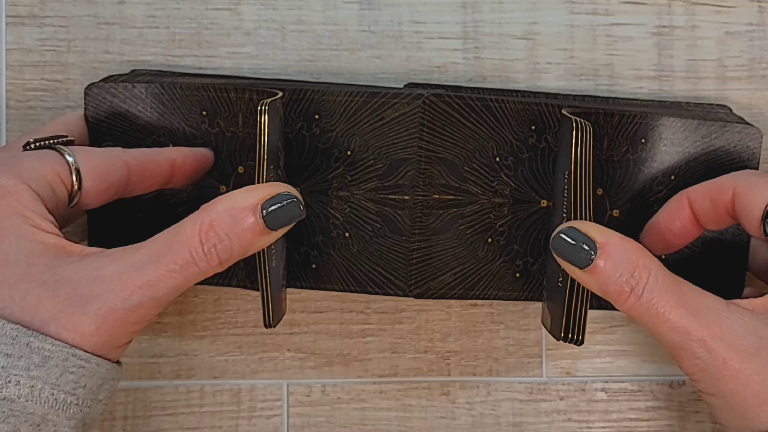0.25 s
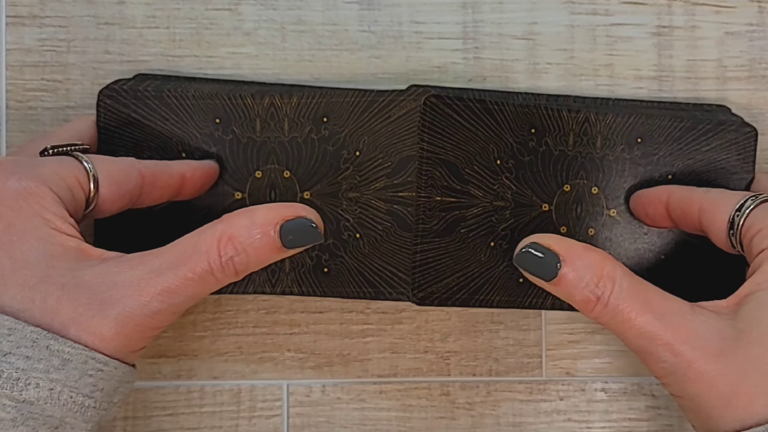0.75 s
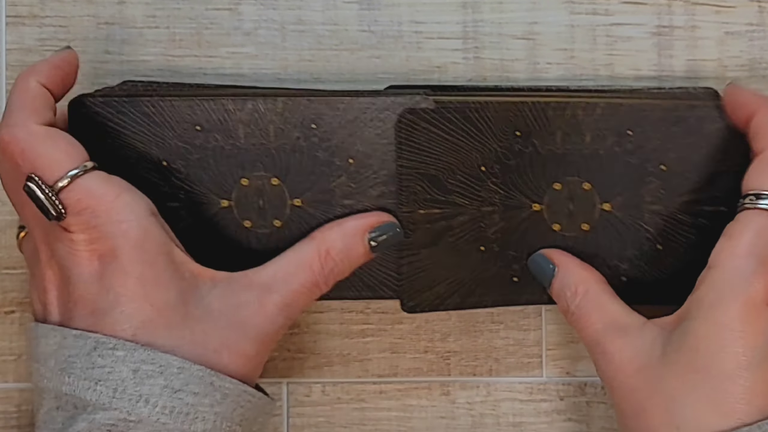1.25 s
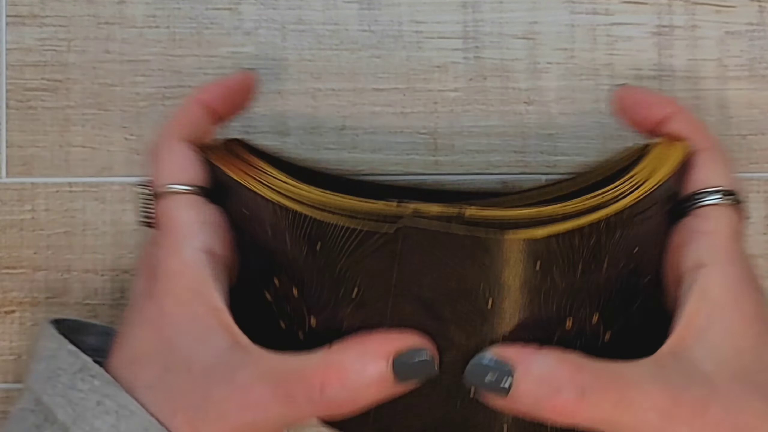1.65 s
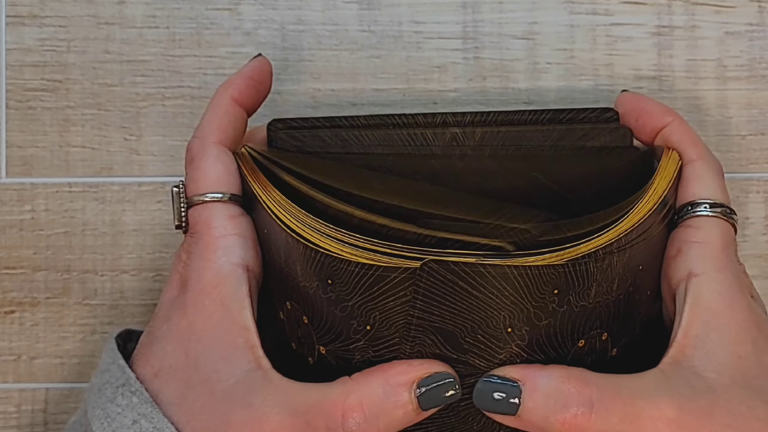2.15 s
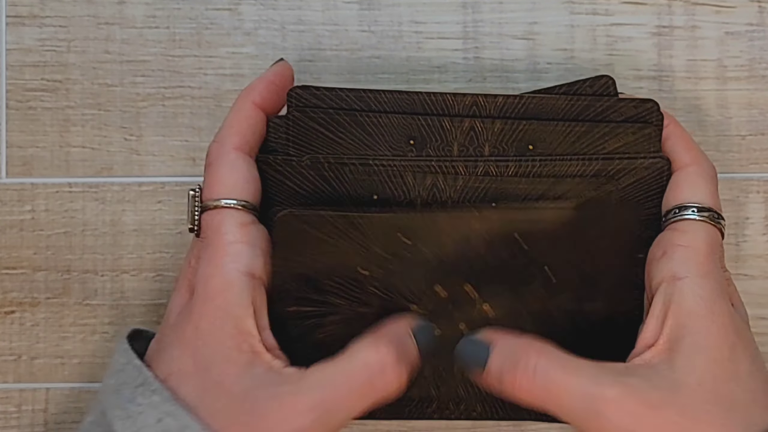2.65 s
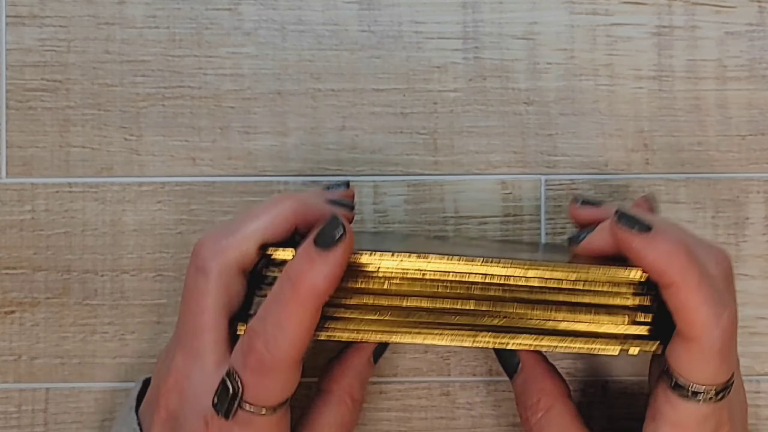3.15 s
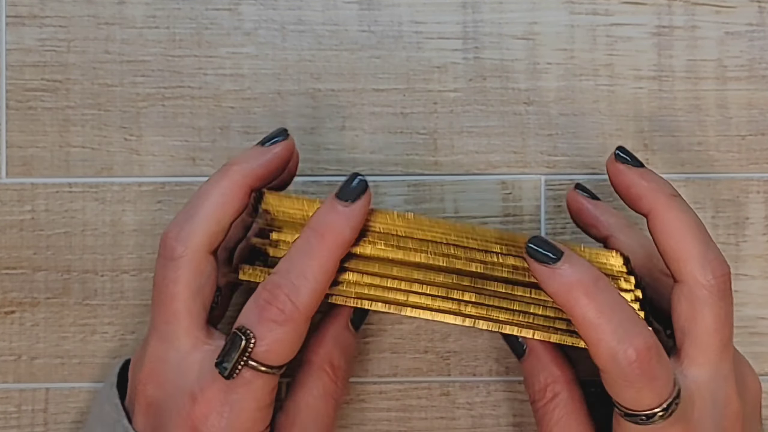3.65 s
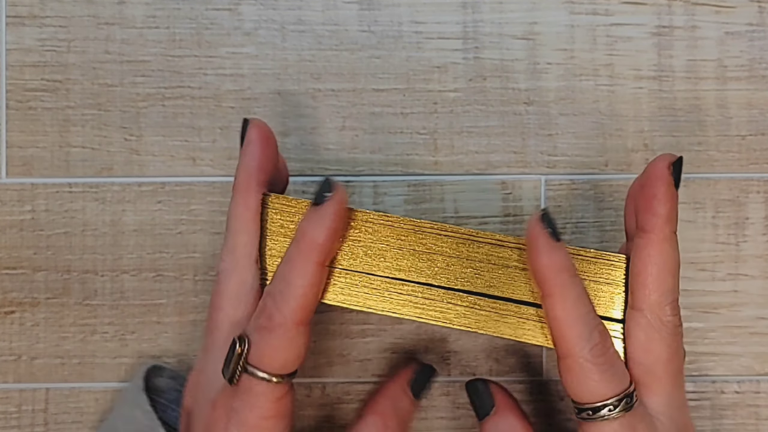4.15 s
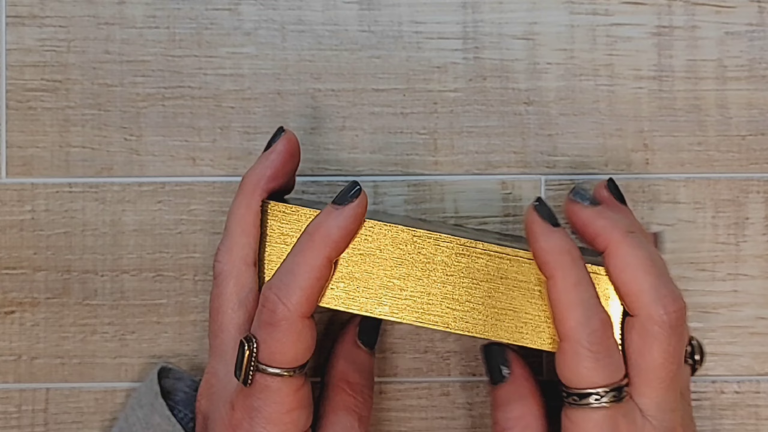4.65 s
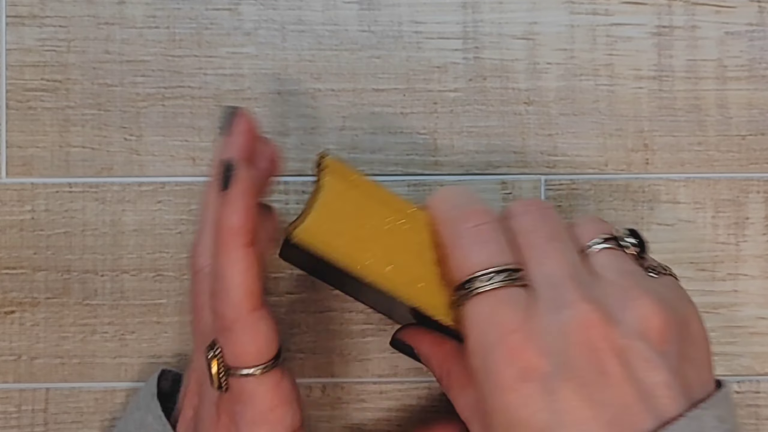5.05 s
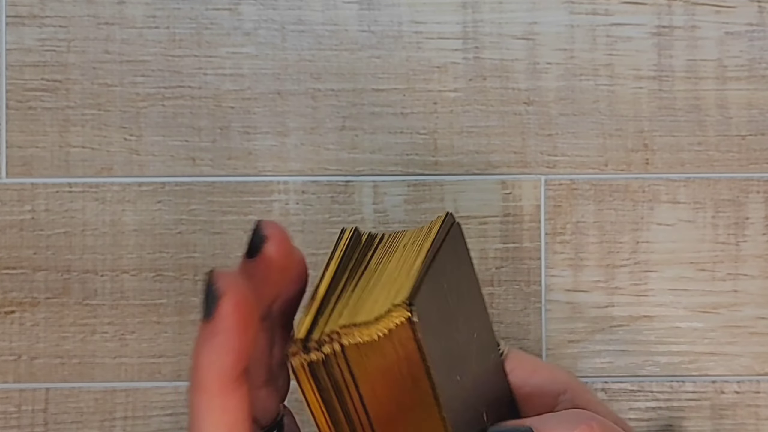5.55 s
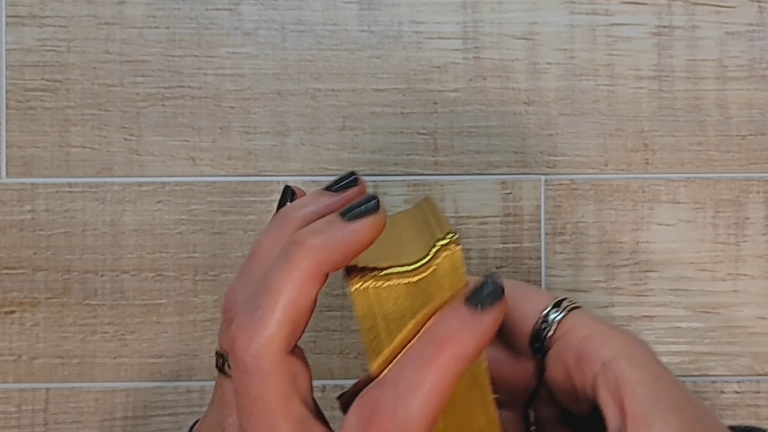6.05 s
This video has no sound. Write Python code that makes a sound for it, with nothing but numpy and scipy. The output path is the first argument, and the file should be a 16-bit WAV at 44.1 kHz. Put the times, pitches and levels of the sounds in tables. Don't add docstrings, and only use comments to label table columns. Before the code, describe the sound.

Close, dry sound of a stiff, glossy card deck handled over a wooden table in a small quiet room. From 0 to 0.9 s, the riffle: edges snap off the thumbs and cards slap flat, spaced at first, then crowding after 0.5 s, with soft low table booms beneath. From 1 to 1.7 s only faint slides and tiny ticks. About 1.8 to 2.8 s the bridge releases in a bright, hissing, fluttering cascade with pats and little airy whistles, closing on a sharp crack at 2.82. A smooth papery push runs 2.95 to 3.15 s, then a loud clattering tap cluster around 3.3 with a table thump. Lighter ticks, rubs and fingertip scuffs square the deck until 4.3 s. Near quiet follows; at 5.1 to 5.3 s come a slide, touches and one hard bright knock. Faint handling and low room murmur remain to about 6.3 s.

```python
import sys
import numpy as np
from scipy import signal
from scipy.io import wavfile
from scipy.ndimage import uniform_filter1d

SR = 44100
rng = np.random.default_rng(int(sys.argv[2]) if len(sys.argv) > 2 else 0)


def field_ratio(decibels):
    return 10 ** (np.asarray(decibels, dtype=float) / 20)


def persist_wave(psi):
    counts = np.round(np.clip(psi, -1, 1) * 32767).astype(np.int16)
    wavfile.write(sys.argv[1], SR, np.atleast_2d(counts).T)


N = 277551

# pitch in Hz, width in Hz, level in dB.
TABLE_LOW_MODES = [(64.7, 8.3, 0.5), (83, 23, 2.5), (105.8, 13, -1)]
# pitch in Hz, width in Hz, level in dB.
TABLE_UPPER_MODE = [(167, 15, 0)]
# frequency in Hz, level in dB per Hz.
RUB_TONE = [(700, -6), (1200, 0), (1800, 2.5), (2800, -0.5), (4000, -3.5), (7000, -20.5)]
# frequency in Hz, level in dB per Hz.
SHEEN_TONE = [(2800, -8.5), (4500, -5), (6500, -1.5), (10000, -11.5), (13000, -11), (16000, -16)]
# frequency in Hz, level in dB per Hz.
FINGER_TONE = [(170, 1.5), (250, -1), (450, 0), (800, -5), (1200, -18)]
# frequency in Hz, level in dB per Hz.
ROOM_TONE = [(15, -55.5), (25, -29), (64, -23.5), (80, 2), (102, -6.5), (145, -12.5), (277, -17),
             (363, -20), (394, -31), (427, -33.5), (591, -35.5), (1750, -51.5), (2200, -62), (6000, -66),
             (16000, -88)]
ROOM_TONE_DB = -50.5
ROOM_T60_S, WALL_CUT_HZ, ROOM_DB = 0.12, 6700, -18
BURST = 2500
# start in seconds, peak in dB, pitch in Hz, air above it in dB, body below it in dB, length in ms.
CRACKS = [
    (2.817, -6.5, 7750, -14.5, -34, 1.6),
    (5.266, -8.5, 4835, -14.5, -30.5, 4.8),
]
# time in seconds, looseness as a plain factor.
LOOSENESS = [(0, 0.21), (2.02, 1), (2.07, .7), (2.79, 0.8), (2.83, 0.19), (3.16, 0.13), (3.22, 0.65),
             (4.15, 1), (4.25, .25), (6.29, 0.22)]
# start in seconds, peak in dB, edge pitch in Hz.
THUMB_FLICKS = [(0.0268, -20.5, 4430), (0.0553, -22.5, 3955), (0.0742, -22, 3666), (0.1612, -31.5, 4030),
                (0.1707, -18.5, 4200), (0.2864, -21, 4000), (0.3089, -19.5, 4346), (0.3777, -27.5, 4004),
                (0.3828, -19, 4360), (0.5128, -15.5, 5100), (0.5454, -13.5, 7100), (0.633, -11, 3607),
                (0.666, -10, 4400), (0.6936, -13.5, 4600), (0.7125, -13.5, 7050), (0.7805, -7.5, 5560),
                (0.8699, -13, 6520)]
# start in seconds, peak in dB, edge pitch in Hz.
EDGE_FLICKS = [(1.8519, -20, 3960), (1.9125, -19.5, 5700), (2.0004, -19, 5500), (2.0762, -17, 5630),
               (2.116, -15.5, 5600), (2.127, -22, 6000), (2.2027, -17.5, 6860), (2.2225, -15, 4200),
               (2.4713, -17.5, 4900), (2.4982, -16, 4830), (2.5768, -16, 6400), (2.6281, -15, 4680),
               (2.7658, -12.5, 7500), (2.855, -32, 3810), (5.1941, -35, 4535), (5.222, -25.5, 5200),
               (5.815, -59.5, 6230), (5.8616, -57.5, 6530), (6.1945, -51.5, 4580), (1.9794, -25, 2360)]
THUMB_MS, THUMB_AIR_DB, EDGE_MS, EDGE_AIR_DB = 1.2, -22, 1.7, -15
# start in seconds, peak in dB, card pitch in Hz, length in ms.
RIFFLE_SLAPS = [(0.041, -14.5, 1502, 2.5), (0.069, -13, 1406, 4), (0.086, -1.5, 1596, 1.06),
                (0.095, -23, 2730, 1.1), (0.184, -6.5, 1017, 2.6), (0.302, -16, 1757, 3.9),
                (0.326, -5, 1475, 2.3), (0.3957, -4, 1150, 2.8), (0.529, -10, 1125, 2.9),
                (0.5594, -4, 1227, 2.4), (0.578, -24, 1965, 1.5), (0.6473, -3.5, 2124, 3.2),
                (0.6798, -9, 1780, 3.3), (0.709, -7.5, 2998, 5.8), (0.794, -4.5, 1774, 4.1),
                (0.885, -14, 2040, 2.9)]
# start in seconds, peak in dB, card pitch in Hz, length in ms.
CASCADE_SLAPS = [(1.7985, -20, 1600, 4.4), (1.878, -12, 1940, 1.7), (1.888, -10.5, 914, 2.5),
                 (2.052, -9, 1053, 2.8), (2.138, -26, 1440, 3.9), (2.234, -14.5, 1390, 2.8),
                 (2.533, -12.5, 1558, 4.0), (2.599, -21.5, 1290, 2), (2.652, -12.5, 1567, 6.3),
                 (2.842, -26, 2780, 3.9), (1.864, -13, 1560, 4.0), (1.871, -4, 2132, 3.3)]
# start in seconds, peak in dB, card pitch in Hz, length in ms.
GATHER_TAPS = [(1.196, -46, 1270, 4.2), (1.318, -36.5, 1230, 3.3), (1.461, -49.5, 3830, 6.4),
               (1.53, -40, 3370, 2.7), (2.793, -24.5, 1320, 1.8), (3.183, -28, 2540, 3.7),
               (3.201, -17.5, 2383, 5.2), (3.227, -21, 2500, 2.5), (3.249, -27.5, 2432, 5.3),
               (3.3, -5.5, 1840, 2.7), (3.3105, -3, 3206, 4.52), (3.319, -1, 3525, 6),
               (3.335, -8, 2960, 3.4), (3.377, -18, 1643, 4.9), (3.389, -17, 1680, 6.2)]
# start in seconds, peak in dB, card pitch in Hz, length in ms.
SQUARE_TAPS = [(3.448, -36, 1870, 3.6), (3.453, -20, 2560, 4.2), (3.5, -20, 1920, 4.3),
               (3.572, -27.5, 1580, 6.7), (3.621, -17.5, 2310, 4.8), (3.667, -20, 2920, 5.2),
               (3.7245, -35, 1810, 3.7), (3.869, -49.5, 1320, 3.7), (3.897, -41.5, 2280, 4.2),
               (3.95, -15, 2200, 9.8), (3.992, -27, 1685, 2.3), (4.015, -26.5, 1660, 4.09),
               (4.026, -14, 3300, 6.6), (4.031, -15.5, 2300, 2.5), (4.06, -37.5, 1820, 3.3),
               (4.092, -20.5, 3570, 10), (4.108, -25, 1670, 7.1), (4.26, -26.5, 3990, 4),
               (5.102, -29, 2434, 5.7), (5.668, -53, 4090, 3.86)]
# time in seconds, rub in dB, gloss above it in dB, grip above it in dB.
RIFFLE_DRAG = [
    (0, -57.5, -1.5, -4),
    (0.45, -63.5, -7.5, 0.5),
    (0.74, -47, -3.5, -20.5),
    (0.95, -64.5, -1.5, 2),
    (1.02, -83, -4.5, 1.5),
]
# time in seconds, rub in dB, gloss above it in dB, grip above it in dB.
CASCADE_SLIDE = [(1.745, -63, 1, -8), (1.822, -44, 12.5, -23), (1.885, -34.5, 5, -10.5),
                 (2.03, -41.5, 12.5, -11), (2.09, -35, 7, -2.5), (2.42, -37.5, 11, -9.5),
                 (2.66, -31.5, 3.5, -8), (2.785, -39, 13.5, -1.5), (2.805, -44, -6, 5)]
# peak time in seconds, rub in dB, gloss above it in dB, grip above it in dB, length in seconds.
STROKES = [(1.113, -70.5, -16, -6, 0.13), (1.254, -53, -6.5, -2, 0.072), (1.314, -54, -3, -16, 0.043),
           (1.414, -55, -6, -3, 0.071), (1.471, -56.5, 2.2, -1, 0.044), (1.535, -47.5, -2.5, 4, 0.032),
           (1.654, -51, -3, -3, 0.15), (2.815, -43, -5, -4, 0.1), (5.134, -47.5, 4.5, 1, 0.037),
           (3.254, -34.5, -12, 1, 0.093), (3.336, -24.5, -14.5, -10, 0.08), (3.519, -57, -13, 7, 0.2),
           (3.603, -42, -19, 4.5, 0.13), (3.804, -50.5, -11, 2.5, 0.067), (4.053, -43, -10, 4, 0.1),
           (4.294, -49.5, -4.5, 9.5, 0.051), (4.337, -70, -8.5, 8, .13), (4.821, -80.5, -10.5, 20.5, 0.085),
           (4.991, -55, -9.5, 8.5, 0.067), (5.142, -41.5, -8.5, 5, 0.099), (5.209, -35.5, -7.5, 1.5, 0.054),
           (5.299, -45, 2.5, -3, 0.07), (5.689, -76.5, 2.5, 12.5, 0.15), (5.977, -60.5, 2.5, 0.5, 0.12),
           (6.209, -77, -2.5, 1, 0.19)]
STROKE_DROP_DB, STROKE_ROUND, STROKE_ATTACK = 22, 1.02, 0.94
# rub in dB, gloss in dB, grip in dB.
RESTING_DB = (-88, -85.5, -77.5)
# peak time in seconds, low boom in dB, upper mode in dB, length in seconds.
LEANS = [(0.1, -32.5, -43.5, 0.21), (0.35, -29.5, -41, 0.13), (0.588, -31.5, -36.5, 0.16),
         (0.733, -30.5, -43, 0.19), (0.913, -31.5, -45, .12), (1.27, -43, -50, 0.14),
         (1.487, -35, -39.5, 0.065), (1.572, -37.5, -32.5, 0.14), (1.9, -33, -41, 0.084),
         (2.102, -30, -50, 0.17), (2.297, -37.5, -46.5, 0.88), (2.662, -29, -33.5, 0.24),
         (3.116, -52.5, -47.5, 0.22), (3.336, -27.5, -29.5, 0.15), (3.63, -48.5, -31.5, 0.13),
         (3.922, -50.5, -50.5, 0.41), (4.12, -37.5, -40.5, 0.085), (4.31, -54, -55.5, 0.17),
         (5.133, -38, -39.5, 0.21), (5.29, -28.5, -37.5, 0.097)]
TABLE_REST_DB, UPPER_STEEPER = (-55, -68), 1.3
# start in seconds, peak in dB.
PATS = [(2.05, -12.5), (2.082, -25), (2.125, -23), (2.165, -29), (2.191, -23), (2.232, -16), (2.365, -18.5),
        (2.498, -26), (2.532, -29), (2.593, -37), (2.628, -17), (2.705, -21.5), (2.758, -29), (2.79, -17)]
PAT_MS, PAT_LOW_HZ, PAT_TOP_HZ, PAT_DB, PAT_LAG_S = 1.6, 150, 1580, 4, 0.003354
# start in
# seconds, peak in dB, card pitch in Hz, length in ms.
DECK_TOUCHES = [(4.8, -62.5, 800, 6.0), (5.943, -40.5, 680, 16), (5.95, -39, 3500, 8.3),
                (2.897, -46, 1900, 2.8), (0.31, -19, 4400, 4.5), (5.7, -55, 3400, 13),
                (0.541, -24.5, 4500, 6.2), (3.287, -22, 2000, 8), (5.269, -6, 6300, 3.0),
                (6.247, -56, 3100, 3.1)]
SETTLE_S, SETTLE_DB, SETTLE_HZ, SETTLE_WIDTH_HZ, SETTLE_T60_S = 5.272, -40.5, 5180, 2300, 0.31
HAZE_DB = -82
# time in seconds, rub in dB, gloss above it in dB, grip above it in dB.
PUSH_SLIDE = [
    (2.93, -64, -8.5, -24),
    (3.04, -34.5, -4.5, -13.5),
    (3.115, -33, -6, -11.5),
    (3.16, -56.5, -8, -9),
]
# time in seconds, peak in dB, pitch in Hz.
WHISTLES = [(1.853, -21.5, 3970.0), (1.869, -13, 2200.0), (1.886, -22.5, 4300.0), (1.888, -21.5, 2540.0),
            (1.978, -21.5, 2430.0), (1.99, -22, 2540.0), (1.994, -20, 6620.0), (1.998, -30, 5730.0),
            (2.079, -20.5, 5730.0), (2.104, -24, 6840.0), (2.114, -21.5, 6500.0), (2.114, -21.5, 5290.0),
            (2.145, -25, 5840.0), (2.155, -19, 6840.0), (2.209, -20, 6730.0), (2.21, -17.5, 5400.0),
            (2.22, -19, 3860.0), (2.26, -23.5, 6730.0), (2.282, -24, 5730.0), (2.302, -20.5, 6730.0),
            (2.386, -20.5, 5070.0), (2.435, -22, 5400.0), (2.469, -17.5, 4740.0), (2.497, -17, 4630.0),
            (2.519, -24, 4410.0), (2.532, -20, 4630.0), (2.558, -23, 4080.0), (2.571, -15.5, 6500.0),
            (2.588, -22, 5620.0), (2.61, -22.5, 6620.0), (2.624, -21.5, 3860.0), (2.628, -22, 4850.0),
            (2.652, -22, 4520.0), (2.659, -23, 6390.0), (2.665, -25.5, 5180.0), (2.672, -23, 6730.0),
            (2.693, -22.5, 4190.0), (2.72, -22, 2430.0), (2.723, -22, 5290.0), (2.732, -23.5, 6950.0),
            (2.738, -24, 4960.0), (2.762, -23, 7390.0), (2.764, -19.5, 8490.0), (2.815, -25, 7830.0),
            (2.815, -25, 8820.0)]
WHISTLE_MS, WHISTLE_WIDTH_HZ, WHISTLE_DB = 2.6, 220, -1.5
# start in seconds,
# peak in dB, card pitch in Hz, length in ms.
DROPS = [(1.843, -22.5, 1510, 1.7), (2.126, -20, 900, 2.0), (2.166, -26.5, 1200, 2.5),
         (2.192, -22.5, 904, 2.5), (2.27, -16.5, 2600, 4.0), (2.331, -21, 1800, 2.5),
         (2.45, -28.5, 1340, 2.5), (2.465, -26.5, 1200, 3.3), (2.705, -21.5, 800, 3.0),
         (2.759, -23.5, 1100, 3.0), (2.782, -27, 1000, 2.4), (3.474, -38.5, 1800, 3.7),
         (4.24, -50, 800, 6.0), (4.3, -46, 1304, 15), (3.555, -31, 600, 7.9)]
# pitch in Hz, level in dB, t60 in seconds.
BLOCK_MODES = [(850, -8.5, .03), (1560, -6.5, 0.061), (2500, 0.5, 0.045), (2920, -13.5, 0.12),
               (4200, -2, 0.058), (5200, -2.5, 0.068), (5600, -19, 0.11), (8340, -10, 0.087)]
# start in seconds, peak in dB, treble tilt in dB per octave.
KNOCKS = [
    (5.101, -32.5, -13.5),
    (5.196, -41.5, -4.5),
    (5.218, -33.5, 3.5),
    (5.266, -20.5, 3),
]
# time in seconds, peak in dB, pitch in Hz.
BOWS = [(0.085, -29, 730), (0.311, -21, 4300), (0.323, -16.5, 1494), (0.394, -19.5, 8000),
        (0.558, -26.5, 725), (0.631, -25, 4100), (0.691, -28.5, 1720), (0.708, -22.5, 1660),
        (0.868, -30.5, 1202), (1.196, -50.8, 500.0), (1.237, -50, 1190), (1.247, -53, 1430.0),
        (1.421, -51, 490), (1.508, -51, 1430.0), (1.852, -23.5, 3970), (1.913, -25, 4040.0),
        (1.954, -30.0, 2000), (2.02, -26.5, 4800.0), (2.089, -33.5, 365), (2.167, -31.5, 426),
        (2.232, -33, 306), (2.335, -25.5, 4800.0), (2.351, -22.5, 4800.0), (2.353, -36, 1430),
        (2.371, -28, 2430), (2.385, -35, 980), (2.482, -33.5, 2020.0), (2.588, -19.5, 5710.0),
        (2.593, -31.5, 1030), (2.594, -31, 1670), (2.609, -29.5, 1420), (2.63, -32, 442),
        (2.681, -22.5, 4750), (2.757, -31.5, 710.0), (2.815, -30, 1420), (3.064, -27, 1710),
        (3.308, -26, 850.0), (3.308, -21, 1710), (3.499, -35, 2400), (3.515, -43.5, 425),
        (3.537, -41, 360.0), (3.572, -39.5, 610), (3.647, -42, 608), (4.03, -40.5, 500), (4.06, -36.5, 513),
        (4.094, -32.5, 612), (5.204, -34.5, 723), (5.991, -61, 1010.0)]
BOW_MS, BOW_CYCLES, BOW_WIDTH, BOW_DB = 1.8, 1.1, 0.14, 1.5
# start in seconds, peak in dB, edge pitch in Hz.
CREEPS = [(0.018, -47.5, 3500), (0.282, -42.5, 4200), (0.506, -33.5, 5000), (0.628, -28.5, 4950),
          (0.777, -31, 5540), (0.866, -34, 6540)]
# start in seconds, peak in dB, pitch in Hz, length in ms.
SCUFFS = [(3.51, -44, 545, 14), (3.545, -36, 650, 14), (3.64, -44, 600, 12), (3.864, -38.5, 614, 6.0),
          (4.275, -47.5, 1105, 13), (4.295, -45.5, 1700, 9.0), (4.795, -53.5, 610, 12),
          (5.125, -35.5, 5460, 7.0), (5.108, -40, 4500, 9.0), (5.935, -45.5, 720, 9.0),
          (0.065, -20.5, 805, 3.0)]
# start in seconds, peak in dB, edge pitch in Hz.
SNAPS = [(0.0838, -21, 9000), (2.1165, -13, 6400), (2.2214, -17, 4400), (2.0025, -21, 5100),
         (2.766, -14, 7100), (2.1285, -21, 2900)]
PUSH_MS, PUSH_DB, PUSH_LAG = 0.45, -18, 0.88


def rms_one(x):
    return x / np.sqrt(np.mean(x ** 2) + 1e-20)


def peak_one(x):
    return x / (np.max(np.abs(x)) + 1e-20)


def in_time(rows):
    s, *columns = np.transpose(rows)
    return [np.interp(np.arange(N) / SR, s, column) for column in columns]


def at_hz(points, hz):
    point_hz, point_db = np.transpose(points)
    return np.interp(np.log(hz), np.log(point_hz), point_db)


def drift(rate):
    r = np.exp(-40 * np.pi * rate / SR)
    white = rng.standard_normal(N // 20 + 2002)
    slow = signal.lfilter([1], [1, -2 * r, r * r], white)[2000:]
    return np.interp(np.arange(N) / 20, np.arange(len(slow)), rms_one(slow))


def resonate(x, hz, width_hz):
    r = np.exp(-np.pi * width_hz / SR)
    zeros = np.array([1, 0, -1]) * (1 - r * r) / 2
    return signal.lfilter(zeros, [1, -2 * r * np.cos(2 * np.pi * hz / SR), r * r], x)


def resonate_twice(x, hz, width_hz):
    return resonate(resonate(x, hz, width_hz), hz, width_hz)


def band(x, low_hz, high_hz):
    return signal.sosfilt(signal.butter(2, [low_hz, high_hz], "band", fs=SR, output="sos"), x)


def coloured(tone, patchy_db, shared, rate):
    octaves = np.log2(tone[-1][0] / tone[0][0])
    edges = tone[0][0] * 2 ** np.arange(0, octaves + .01, 1 / 2.5)
    white = rng.standard_normal((2, N))
    together = drift(rate)
    out = 0
    for k, (low, high) in enumerate(zip(edges, edges[1:])):
        flicker = np.exp(np.log(field_ratio(patchy_db)) * (shared * together + drift(rate)))
        level = field_ratio(at_hz(tone, np.sqrt(low * high)))
        out = out + level * flicker * band(white[k % 2], low, high)
    return rms_one(out)


def swells(rows, rest_db, steeper):
    t = np.arange(0, N + 64, 64) / SR
    power = field_ratio(np.array(rest_db)[:, None] + 0 * t) ** 2
    for s, *peaks_db, length in rows:
        away = np.abs(t - s) / length / np.where(t < s, STROKE_ATTACK, 1)
        fall_db = np.outer(steeper, STROKE_DROP_DB * away ** STROKE_ROUND)
        power += field_ratio(np.array(peaks_db)[:, None] - fall_db) ** 2
    return np.array([np.interp(np.arange(N) / SR, t, gain) for gain in np.sqrt(power)])


def contacts(rows, sound):
    out = np.zeros(N + BURST)
    ms = np.arange(BURST) / SR * 1e3
    chances = rng.standard_normal((len(rows), 3, BURST))
    for (s, peak_db, *look), chance in zip(rows, chances):
        at = round(s * SR)
        out[at:at + BURST] += field_ratio(peak_db) * sound(ms, chance, *look)
    return out[:N]


def landed(rows, air_db, air_lag, body_db, body_lag):
    return [(s, db, hz, air_db - air_lag * db, body_db - body_lag * db, ms) for s, db, hz, ms in rows]


def room_hush():
    return field_ratio(ROOM_TONE_DB - 3) * coloured(ROOM_TONE, patchy_db=-1.5, shared=0.27, rate=1.5)


def room(x):
    t = np.arange(SR // 2) / SR
    white = rng.standard_normal(len(t))
    dull = band(white, 150, WALL_CUT_HZ)
    tail = dull * field_ratio(-60 * t / ROOM_T60_S) + (white - dull) * field_ratio(-60 * t / (1.16 * ROOM_T60_S))
    tail *= np.clip(t / 0.0052, 0, 1)
    return field_ratio(ROOM_DB) * signal.fftconvolve(x, tail / np.sqrt(np.sum(tail ** 2)))[:N]


def squeaks(per_s, cycles):
    caught = rng.random(N) < per_s / SR
    sizes = field_ratio(2.0 * np.minimum(rng.exponential(1, N), 4)) * caught
    pitches = np.geomspace(3500, 8500, 9)
    dealt = rng.integers(0, 9, N)
    catches = np.stack([sizes * (dealt == k) for k in range(9)])
    smear = signal.lfilter([1], [1, -.985], catches + 1e-18)
    white = rng.standard_normal(N)
    return rms_one(sum(resonate(e * white, hz, hz / cycles) for e, hz in zip(smear, pitches)))


def flutter(per_s, ms):
    cards = rng.exponential(1, N) * (rng.random(N) < per_s / SR)
    swell = signal.lfilter([1], [1, -np.exp(-1e3 / (ms * SR))], uniform_filter1d(cards, size=30))
    gain = 1 + np.maximum(in_time(LOOSENESS)[0], 0) * swell / 0.92
    return gain / np.sqrt(uniform_filter1d(gain ** 2, size=9000))


def sliding():
    strokes = [(s, db, db + gloss, db + grip, length) for s, db, gloss, grip, length in STROKES]
    power = swells(strokes, RESTING_DB, [1, 1.05, .8]) ** 2
    t = np.arange(N) / SR
    for rows in (RIFFLE_DRAG, CASCADE_SLIDE, PUSH_SLIDE):
        rub, gloss, grip = in_time(rows)
        on = (t >= rows[0][0]) & (t < rows[-1][0])
        power[:, on] += field_ratio(rub[on] + [0 * rub[on], gloss[on], grip[on]]) ** 2
    return np.sqrt(power)


def rubbing():
    rub_gain, sheen_gain, finger_gain = sliding()
    rub = coloured(RUB_TONE, patchy_db=1.5, shared=1.0, rate=30)
    gloss = coloured(SHEEN_TONE, patchy_db=1.63, shared=1.0, rate=31)
    sheen = rms_one(gloss + field_ratio(-10) * squeaks(per_s=810, cycles=49))
    fingers = coloured(FINGER_TONE, patchy_db=2.0, shared=1.1, rate=8.1)
    cards = flutter(per_s=95, ms=2.5)
    out = rub_gain * rub * cards ** 0.6
    out += sheen_gain * sheen * cards ** 0.22
    return out + finger_gain * fingers * cards ** 1.2


def flick(ms, chance, hz, air_db, length):
    a, b, c = chance
    length = max(length, .3)
    shape = (ms / length) ** 1.4 * np.exp(-ms / length)
    slips = shape * a * np.abs(b) ** 0.48
    edge = peak_one(resonate_twice(slips, hz, 0.26 * hz))
    edge = peak_one(edge + field_ratio(2.0) * peak_one(band(band(slips, 4100, 9300), 3500, 8100)))
    air = field_ratio(air_db + 6.5) * peak_one(band(shape * c, 8000, 15500))
    return edge + air + field_ratio(-13.0) * peak_one(band(slips, 550, 1800))


def edge_creeps():
    return contacts([(*row, -24.0, 1.6) for row in CREEPS], flick)


def edge_flicks():
    flicks = [(*row, THUMB_AIR_DB, THUMB_MS) for row in THUMB_FLICKS]
    flicks += [(*row, EDGE_AIR_DB, EDGE_MS) for row in EDGE_FLICKS]
    return contacts(flicks, flick)


def air_push(ms, chance):
    away = (ms - 2) / PUSH_MS
    return peak_one(band(away * np.exp(-away ** 2 / 2), 110, 1500))


def landing_air():
    return contacts([(s - .002, PUSH_DB + PUSH_LAG * db) for s, db, *_ in RIFFLE_SLAPS], air_push)


def slap(crack_db, broad_db, top_hz, air_db, body_db):
    def sound(ms, chance, hz, air, body, length):
        a, b, c = chance
        shape = (1 - np.exp(-ms / 0.32)) * np.exp(-ms / max(length, .3))
        slips = shape * a * np.abs(b) ** 0.59
        slips[8] += field_ratio(crack_db) * np.sign(a[0])
        card = peak_one(resonate(slips, hz, 0.34 * hz))
        card = peak_one(card + field_ratio(broad_db) * peak_one(band(slips, 420, top_hz)))
        card = band(card, 180, 1.02 * top_hz)
        hiss = field_ratio(air + air_db) * peak_one(band(shape * c, 6000, 16000))
        return card + hiss + field_ratio(body + body_db - 4.0) * peak_one(band(slips, 220, 750))
    return sound


def flat_landings():
    slaps = landed(RIFFLE_SLAPS, air_db=-18.0, air_lag=0.045, body_db=-25.5, body_lag=1.0)
    slaps += landed(CASCADE_SLAPS, air_db=-21.0, air_lag=.05, body_db=-20.5, body_lag=0.31)
    return contacts(slaps, slap(crack_db=9.0, broad_db=4.0, top_hz=5030, air_db=5.5, body_db=7.5))


def scuff(ms, chance, hz, length):
    rub = ms / length * np.exp(-1.6 * ms / length) * chance[0] * np.abs(chance[1]) ** 0.48
    return peak_one(resonate_twice(rub, hz, 0.4 * hz))


def corner_snaps():
    return contacts([(*row, -12.0, .45) for row in SNAPS], flick)


def bow(ms, chance, hz):
    length = BOW_MS + 1e3 * BOW_CYCLES / hz
    puff = (ms / length) ** 2 * np.exp(-2 * ms / length) * chance[0]
    return field_ratio(BOW_DB) * peak_one(resonate_twice(puff, hz, BOW_WIDTH * hz))


def table():
    gains = swells(LEANS, TABLE_REST_DB, [1, UPPER_STEEPER])
    whites = rng.standard_normal((2, N))
    out = 0
    for gain, white, modes in zip(gains, whites, (TABLE_LOW_MODES, TABLE_UPPER_MODE)):
        top = sum(field_ratio(db) * resonate_twice(white, hz, width) / np.sqrt(width) for hz, width, db in modes)
        power = uniform_filter1d(uniform_filter1d(rms_one(top) ** 2, size=1800), size=1800)
        out = out + gain * rms_one(top / (power + .05) ** 0.29)
    return out


def deck_touches():
    touches = landed(DECK_TOUCHES, air_db=-24.5, air_lag=.05, body_db=-20.0, body_lag=.05)
    return contacts(touches, slap(crack_db=9.0, broad_db=-11.5, top_hz=6140, air_db=-2.5, body_db=-1.5))


def deck_taps():
    taps = landed(GATHER_TAPS, air_db=-25.0, air_lag=.15, body_db=-22.5, body_lag=0.19)
    taps += landed(SQUARE_TAPS, air_db=-29, air_lag=.1, body_db=-31.0, body_lag=0.57)
    tick = slap(crack_db=13.0, broad_db=4.5, top_hz=4500, air_db=-9.0, body_db=5.5)
    return field_ratio(1.5) * contacts(taps, tick)


def single_drops():
    drops = landed(DROPS, air_db=-30, air_lag=.05, body_db=-10.0, body_lag=.05)
    return contacts(drops, slap(crack_db=3, broad_db=-4.5, top_hz=3500, air_db=-1.5, body_db=-3.5))


def whistle(ms, chance, hz):
    puff = (ms / WHISTLE_MS) ** 2 * np.exp(-2 * ms / WHISTLE_MS) * chance[0]
    return field_ratio(WHISTLE_DB) * peak_one(resonate_twice(puff, hz, WHISTLE_WIDTH_HZ))


def pat(ms, chance):
    push = 0.34 * chance[0] * np.exp(-ms / PAT_MS)
    push[4] += 2.7 * np.sign(chance[1, 0])
    return field_ratio(PAT_DB) * peak_one(band(push, PAT_LOW_HZ, PAT_TOP_HZ))


def corner_cracks():
    return field_ratio(-0.5) * contacts(CRACKS, slap(crack_db=8.5, broad_db=0, top_hz=8000, air_db=8, body_db=0.0))


def block():
    t = np.arange(N) / SR
    out = 0
    for (hz, db, t60), white in zip(BLOCK_MODES, rng.standard_normal((len(BLOCK_MODES), N))):
        octaves_up = max(np.log2(hz / 2500), 0)
        level = 0
        for s, peak_db, tilt_db in KNOCKS:
            ring_db = peak_db + db + tilt_db * octaves_up - 60 * np.abs(t - s) / t60
            level = level + (t > s) * field_ratio(ring_db)
        out = out + level * rms_one(resonate(white, hz, 140))
    return out


def settling():
    after = np.arange(N) / SR - SETTLE_S
    level = field_ratio(SETTLE_DB - 60 * np.abs(after) / SETTLE_T60_S) + field_ratio(HAZE_DB)
    leak = resonate(rng.standard_normal(N), SETTLE_HZ, SETTLE_WIDTH_HZ)
    return (after > 0) * level * rms_one(resonate(leak, SETTLE_HZ, 3 * SETTLE_WIDTH_HZ))


def scene():
    cards = edge_flicks() + flat_landings() + deck_taps() + corner_cracks()
    out = room_hush() + cards + field_ratio(8.5) * room(cards)
    out += rubbing() + table()
    out += edge_creeps() + landing_air() + corner_snaps()
    out += contacts(SCUFFS, scuff)
    out += contacts(np.add(BOWS, [-.0015, 0, 0]), bow)
    out += contacts(np.add(WHISTLES, [-.002, 0, 0]), whistle)
    out += contacts(np.add(PATS, [PAT_LAG_S, 0]), pat)
    out += deck_touches() + single_drops() + block() + settling()
    return out[None]


def band_limit(x):
    return signal.sosfilt(signal.butter(12, 15760, fs=SR, output="sos"), x)


def record(dry):
    mix = 0.56 * np.tanh(dry / 0.57)
    return band_limit(mix)


dry = scene()
out = record(dry)
persist_wave(out)
```